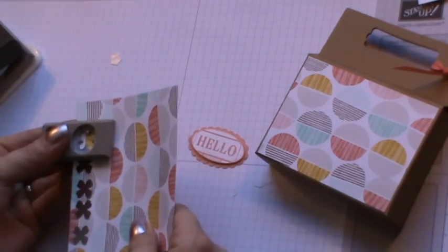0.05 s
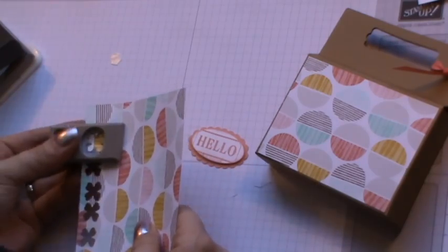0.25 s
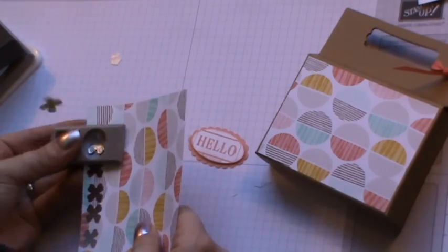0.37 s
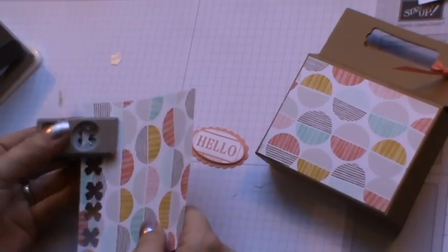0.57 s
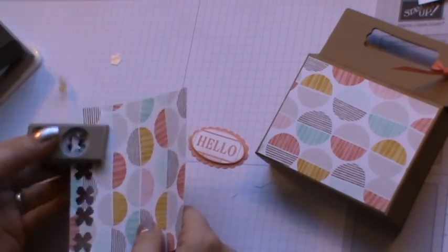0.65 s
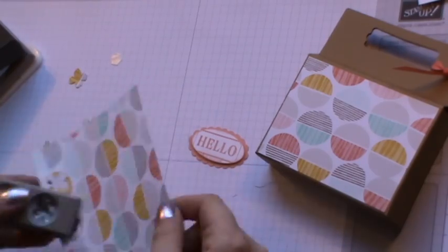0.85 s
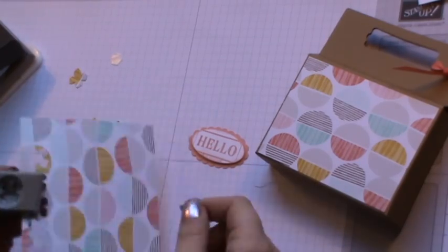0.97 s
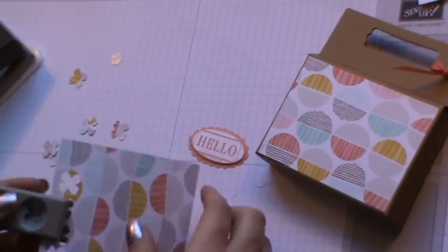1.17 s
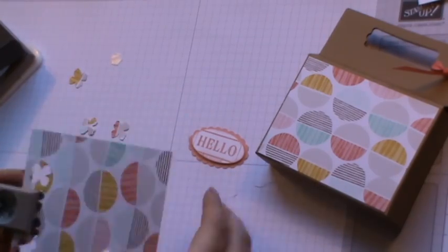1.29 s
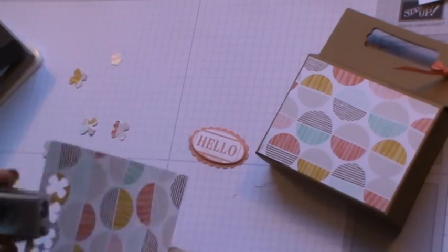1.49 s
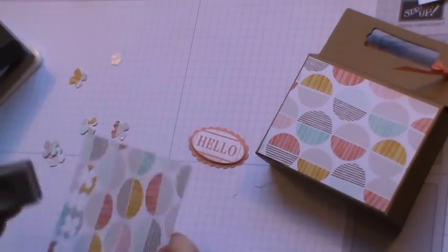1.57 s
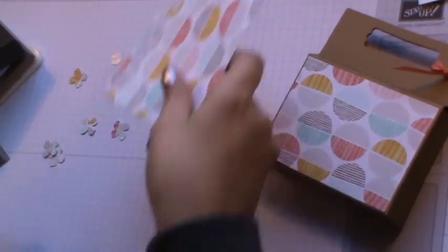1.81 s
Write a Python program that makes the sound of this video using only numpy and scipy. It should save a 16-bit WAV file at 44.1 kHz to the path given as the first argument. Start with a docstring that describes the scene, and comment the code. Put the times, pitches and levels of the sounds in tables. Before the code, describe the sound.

A hand paper punch clicks faintly at the start and more sharply at 0.2 s, then snaps hard through card at 0.35 s with a dull table thump and tearing crackle. Release clicks follow at 0.52 and 0.58 s, another at 0.79 s. Card scrapes and rustles until 1.4 s; light knocks come at 1.46 and 1.59 s. Close, dry room, soft hush, faint motor ticks and high whistle.

```python
"""At a crafting table in a dry room, a small hand punch bites through card, over soft room tone.
The lever clicks and rings, the die snaps through and springs back, and torn fibres crackle.
The card rubs, scrapes out of the slot and is waved aside; the punch is put down with two knocks.
Struck parts are fading sines; rubbing and scraping are shaped noise.
A small motor makes a few stronger steps, then also ticks steadily; a faint high whistle runs throughout."""
import sys
import numpy as np
from scipy import signal
from scipy.fft import rfft, irfft
from scipy.io import wavfile
from scipy.ndimage import uniform_filter1d

SR = 44100
rng = np.random.default_rng(int(sys.argv[2]) if len(sys.argv) > 2 else 0)


def transcribe(u):
    """Save the signal u as a 16-bit wav file named by the first command-line argument.

    u: samples, shape (n,) or (channels, n), limited to [-1, 1]; the rate is SR.
    q: integer samples, one column per channel.
    """
    v = np.clip(np.atleast_2d(u).T, -1, 1)
    q = np.round(v * 32767).astype(np.int16)
    wavfile.write(sys.argv[1], SR, q)


N = 81585
T = np.arange(N) / SR  # time of every sample [s]

# Room tone, before it is scaled to rms 1: (frequency [Hz], level [dB])
ROOM_TONE = [(25, -6.5), (60, -2.5), (130, 1.5), (300, 1), (1500, -6.5), (8000, -11.5), (13000, -13),
             (16000, -21)]
ROOM_TONE_DB = -56
# Side part of sound from all around, relative to the middle part: (frequency [Hz], level [dB])
SIDE_SPECTRUM = [(40, -18), (150, -2), (400, 4.5), (2500, 2.5), (8000, -2.5), (13000, -6.5)]

# Motor resonances, before each tick's chance strength:
# (frequency [Hz], level [dB], swing up and down on alternate ticks [dB])
MOTOR_MODES = [(1936, -60, 1), (2396, -63.5, 2)]
# Stronger motor steps on the upper resonance: (time [s])
STEP_TIMES = [.055, .123, .319, 0.959, 1.003, 1.72, 1.798]
STEP_DB = -54.5
TICK_PERIOD_S, TICK_WIDTH_S, TICKS_FROM_S = 0.0399, 0.0056, 0.37
WHISTLE_HZ, WHISTLE_DB = 15625, -61.5
WHISTLE_FLUTTER_HZ, WHISTLE_FLUTTER = 50, 0.29  # flutter depth is a share of the level

# Colour of the room's echo tail, before its spectrum is levelled out: (frequency [Hz], level [dB])
TAIL_SPECTRUM = [(100, 12.5), (700, 6.5), (2000, 6.5), (8000, 8), (15000, 1.5)]
# Tail settings before levelling; its energy is relative to the direct sound
TAIL_T60_S, TAIL_BUILD_S, TAIL_DB = 0.16, 0.003, -1.5
DIRECT_S, LEFT_DB = 0.0008, 0.5  # delay of the direct sound; left level over right

# Dull knocks passed to the table: (time [s], level [dB], lowest frequency [Hz], highest frequency [Hz])
KNOCKS = [(.001, -38, 620, 1530), (0.35, -16.5, 80, 221), (.578, -40.5, 764, 1370), (.792, -36, 1010, 1420),
          (1.464, -28.5, 302, 506), (1.469, -32, 587, 2730), (1.592, -30, 830, 1440),
          (1.603, -28.5, 550, 660)]
# Ringing of the table top: (frequency [Hz], level [dB], time to fade by 60 dB [s])
TABLE_MODES = [(149, -32.5, 0.074), (390, -8.5, 0.048), (483, -6, 0.045), (620, -4.5, 0.045),
               (875, -6, 0.045), (1108, -2, 0.029), (1460, 4, 0.012), (1893, 8, 0.012), (2555, 9.5, 0.013)]

# Card rubbing: (peak time [s], rise [s], fall [s], hiss level [dB], flutter level [dB],
# flutter frequency [Hz])
RUBS = [(0.169, 0.011, 0.0063, -49, -51.5, 1930), (0.348, 0.0018, 0.00095, -47, -21.5, 2300),
        (0.517, 0.04, 0.014, -50.5, -53.5, 2260), (.578, 0.02, 0.051, -53, -47, 1820),
        (0.851, 0.14, 0.099, -49.5, -57.5, 1720), (1.005, 0.023, 0.033, -63.5, -52, 740),
        (1.335, 0.035, 0.063, -57.5, -61.5, 525), (1.54, 0.028, 0.0037, -43, -50.5, 1880),
        (1.589, 0.0074, 0.0087, -40, -37, 1220), (1.788, 0.12, 0.044, -59, -74, 1030)]
# Colour of the card's hiss, before it is scaled to rms 1: (frequency [Hz], level [dB per Hz])
HISS_SPECTRUM = [(150, -52), (500, 1.5), (1500, 4.5), (3500, 0), (7500, 0.5), (10000, -1), (13000, 4),
                 (16000, -11)]
GRAINS_PER_S, GRAIN_SPREAD_DB = 4600, 4
FLUTTER_Q = 0.71  # low value: a broad resonance
# Card drawn out of the slot: (time [s], level [dB], resonance frequency [Hz])
SLIDE_PATH = [(0.669, -62, 1700), (0.756, -48, 1834), (.80, -47, 1255), (.845, -60, 851),
              (0.969, -63, 649.6)]
SLIDE_WIDTH_HZ = 840

# Spring singing: (peak time [s], rise [s], fall [s], level [dB], frequency at the peak time [Hz])
SPRING_SINGS = [(.01, 0.024, 0.01, -49.5, 3820), (0.545, 0.0091, 0.027, -51, 4030)]
SPRING_WIDTH_HZ, SPRING_SAG_HZ_PER_S = 690, 4300

# Card tearing under the die: (peak time [s], rise [s], fall [s])
CRUNCH_SWELL = (0.3567, 0.012, 0.037)
CRUNCH_PER_S, CRUNCH_HZ, CRUNCH_WIDTH_HZ = 2800, 2320, 1070
CRACKLE_DB, RATTLE_DB = -32, -32.5

# Ringing of the lever as it catches: (frequency [Hz], level [dB], time to fade by 60 dB [s])
LEVER_MODES = [(936, -35.5, 0.026), (1675, -24.5, 0.035), (2400, -23, 0.019)]
LEVER_S = 0.2

# Clicks of the punch: (time [s], crack level [dB], steel level before halving [dB], steel centre [Hz],
# shell level [dB], shell centre [Hz], loss per octave off centre [dB])
CLICKS = [(.002, -25, -31.5, 4230, -27.5, 1370, 5), (.1555, -43, -61, 12000, -55, 1600, 8),
          (0.1695, -34, -54, 12000, -52, 1900, 6), (0.1996, -16.5, -36, 11000, -34.5, 1750, 1.5),
          (.3473, -19.5, -53, 7000, -36, 2020, 20), (0.3500, -3.5, -9, 8900, -15.5, 2070, 16.5),
          (.359, -13, -38, 8900, -14, 2060, 53), (0.516, -20, -32.5, 6800, -34.5, 2170, 8),
          (0.5765, -25.5, -35, 4000, -28, 1390, 7), (0.7855, -19.5, -18, 5200, -38, 1270, 62),
          (1.4627, -27, -37.5, 6500, -30.5, 1030, 9), (1.5378, -43, -40, 11100, -35, 1620, 9),
          (1.5829, -25, -37, 7000, -44, 1400, 5), (1.591, -29.5, -41.5, 10000, -37.5, 1400, -3.5)]
# Ringing of the steel die and spring: (frequency [Hz], level [dB], time to fade by 60 dB [s])
STEEL_MODES = [(3020, -25, 0.021), (3915, 3.5, 0.017), (4780, 4.5, 0.0081), (5400, -2, 0.0059),
               (6395, 8.5, 0.0073), (7530, 5, 0.0055), (8090, -1, 0.0088), (11100, -5, 0.0036)]
# Ringing of the plastic shell: (frequency [Hz], level [dB], time to fade by 60 dB [s])
SHELL_MODES = [(570, -4, 0.016), (896, -6, 0.048), (1652, -5, 0.021), (1980, -1, 0.013), (2256, 3, 0.009),
               (2930, -4, 0.02)]
CRACK_T60_S = 0.0095  # fade time before levelling
CRACK_BOTTOM_HZ, CRACK_BRIGHT_HZ, CRACK_TOP_HZ, CRACK_BODY_DB = 1430, 4030, 14600, -11.5

EVEN_HZ = 300  # width of the average used to level out a spectrum
CUTOFF_HZ = 16200


def from_db(db):
    """Turn decibels into a gain."""
    return 10 ** (np.asarray(db) / 20)


def rms_one(x):
    """Scale a sound to an rms level of 1."""
    return x / np.sqrt(np.mean(x ** 2) + 1e-20)


def pan(db):
    """Give left and right gains that differ by this many decibels."""
    return from_db(np.array([[db], [-db]]) / 2)


def colour(x, points):
    """Make some pitches of a noise louder or softer, following a spectrum table."""
    hz, db = np.transpose(points)
    f = np.maximum(np.arange(N // 2 + 1) * SR / N, 1)
    gain = from_db(np.interp(np.log(f), np.log(hz), db))
    return irfft(rfft(x) * gain, N)


def cut(x, hz, kind, order=2):
    """Keep the part below ("low") or above ("high") a frequency."""
    return signal.sosfilt(signal.butter(order, hz, kind, fs=SR, output="sos"), x)


def resonate(x, hz, width_hz):
    """Pass a sound twice through one resonance for steep sides; rms 1."""
    b, a = signal.iirpeak(hz, hz / width_hz, SR)
    once = signal.lfilter(b, a, x)
    return rms_one(signal.lfilter(b, a, once))


def gliding(hz, width_hz):
    """Make a noise band whose centre follows a pitch curve; rms 1."""
    a, b = cut(rng.standard_normal((2, N)), width_hz / 2, "low")
    phase = 2 * np.pi * np.cumsum(hz) / SR
    return rms_one(a * np.cos(phase) + b * np.sin(phase))


def ring(modes):
    """A struck body sounds as a sum of fading sines, here a quarter second long."""
    t = T[:SR // 4]
    out = np.zeros(len(t))
    for k, (hz, db, t60) in enumerate(modes):
        sign = (-1) ** k  # neighbouring modes start in opposite directions
        fade = 1000.0 ** (-t / t60)
        out += sign * from_db(db) * fade * np.sin(2 * np.pi * hz * t)
    return out


def struck(modes, centre_hz, focus_db):
    """A contact favours modes near its centre pitch; a negative focus favours those far from it."""
    focused = [(hz, db - focus_db * abs(np.log2(hz / centre_hz)), t60) for hz, db, t60 in modes]
    return ring(focused)


def add(out, s, x):
    """Mix a sound in at a time in seconds."""
    i = int(s * SR)
    out[i:i + len(x)] += x[:N - i]


def swell(s, rise, fall):
    """A rounded rise to a peak, then a rounded fall."""
    return np.exp(-((T - s) / np.where(T < s, rise, fall)) ** 2)


def even(x):
    """Level out broad humps in a short noise's spectrum, keep its energy, return half a second."""
    spectrum = rfft(x, N)
    local = uniform_filter1d(np.abs(spectrum) ** 2, int(EVEN_HZ * N / SR), axis=-1)
    gain = np.sqrt(np.mean(local) / (np.abs(local) + 1e-12))
    return irfft(spectrum * gain, N)[..., :SR // 2]


def diffuse(spectrum):
    """Stereo noise from all sides: the side part has opposite signs left and right; rms 1."""
    mid, side = rng.standard_normal((2, N))
    stereo = mid + colour(side, SIDE_SPECTRUM) * np.array([[1], [-1]])
    return rms_one(colour(stereo, spectrum))


def grains(per_s=GRAINS_PER_S, spread_db=GRAIN_SPREAD_DB):
    """Paper fibres catch and slip as tiny pulses of random time, size and direction."""
    size_db = spread_db * np.minimum(rng.exponential(1, N), 4)
    sizes = from_db(size_db) * rng.choice([-1, 1], N)
    return sizes * (rng.random(N) < per_s / SR)


def room_tone():
    """The quiet room is a steady, soft noise from all sides."""
    return from_db(ROOM_TONE_DB) * diffuse(ROOM_TONE)


def whistle():
    """A faint high sine whose level flutters quickly."""
    flutter = 1 + WHISTLE_FLUTTER * np.sin(2 * np.pi * WHISTLE_FLUTTER_HZ * T)
    return from_db(WHISTLE_DB) * flutter * np.sin(2 * np.pi * WHISTLE_HZ * T)


def motor():
    """A small motor's regular ticks sound two resonances; stronger steps sound the upper one."""
    nearest = np.round(T / TICK_PERIOD_S).astype(int)  # number of the nearest tick
    tick = np.exp(-((T - nearest * TICK_PERIOD_S) / TICK_WIDTH_S) ** 2) * (T > TICKS_FROM_S)
    out = np.zeros(N)
    for hz, db, swing_db in MOTOR_MODES:
        # each tick has its own strength [dB] and phase [turns]
        strength_db, phase = rng.uniform(-0.93, 1, (2, N))[:, nearest]
        level = from_db(db + swing_db * (-1) ** nearest + strength_db)
        out += level * tick * np.sin(2 * np.pi * (hz * T + phase))
    steps = sum(np.exp(-((T - s) / TICK_WIDTH_S) ** 2) for s in STEP_TIMES)
    return out + from_db(STEP_DB) * steps * np.sin(2 * np.pi * MOTOR_MODES[-1][0] * T)


def room(x):
    """The room adds a short tail of fading noise from all sides to the direct sound."""
    envelope = from_db(-60 * T / TAIL_T60_S) * (1 - np.exp(-T / TAIL_BUILD_S))
    response = diffuse(TAIL_SPECTRUM) * envelope
    response *= from_db(TAIL_DB) / np.sqrt(np.sum(response ** 2) / 2)
    response[:, int(DIRECT_S * SR)] += 1  # the direct sound
    return pan(LEFT_DB) * signal.fftconvolve(x[None], even(response), axes=1)[:, :N]


def table():
    """Knocks ring the table top; place and softness of the contact decide which pitches answer."""
    out, top = np.zeros(N), ring(TABLE_MODES)
    for s, db, low_hz, high_hz in KNOCKS:
        knock = cut(cut(top, high_hz, "low", order=4), low_hz, "high", order=4)
        add(out, s, from_db(db) * knock)
    return out


def card():
    """Rubbed card hisses with fine grains; similar grains shake the sheet in a broad resonance."""
    hiss = rms_one(colour(grains(), HISS_SPECTRUM))
    shake = grains()
    out = np.zeros(N)
    for s, rise, fall, hiss_db, flutter_db, hz in RUBS:
        flutter = resonate(shake, hz, hz / FLUTTER_Q)
        out += swell(s, rise, fall) * (from_db(hiss_db) * hiss + from_db(flutter_db) * flutter)
    return out


def slide():
    """The scrape rises slightly, then sinks in pitch as more of the card comes free of the slot."""
    s, db, hz = np.transpose(SLIDE_PATH)
    level = from_db(np.interp(T, s, db, left=-np.inf, right=-np.inf))  # silent outside the path
    return level * gliding(np.interp(T, s, hz), SLIDE_WIDTH_HZ)


def spring():
    """The rubbed spring gives thin, rough notes that sag in pitch as it relaxes."""
    out = np.zeros(N)
    for s, rise, fall, db, hz in SPRING_SINGS:
        note = gliding(hz - SPRING_SAG_HZ_PER_S * (T - s), SPRING_WIDTH_HZ)
        out += from_db(db) * swell(s, rise, fall) * note
    return out


def crunch():
    """Behind the snap the last fibres tear: bright crackles that rattle the shell."""
    snaps = grains(per_s=CRUNCH_PER_S)
    crackle = rms_one(cut(snaps, CRUNCH_HZ, "high"))
    rattle = resonate(snaps, CRUNCH_HZ, CRUNCH_WIDTH_HZ)
    return swell(*CRUNCH_SWELL) * (from_db(CRACKLE_DB) * crackle + from_db(RATTLE_DB) * rattle)


def lever():
    """The lever takes up its play and rings at a few pitches."""
    out = np.zeros(N)
    add(out, LEVER_S, ring(LEVER_MODES))
    return out


def crack():
    """A hard contact gives a very short noise burst, mostly bright with a weaker body."""
    burst = even(rng.choice([-1, 1], N) * from_db(-60 * T / CRACK_T60_S) / 2)
    burst = cut(cut(burst, CRACK_TOP_HZ, "low"), CRACK_BOTTOM_HZ, "high", order=4)
    bright = cut(burst, CRACK_BRIGHT_HZ, "high", order=1)
    return bright + from_db(CRACK_BODY_DB) * burst


def punch():
    """Each click joins a crack, a ring of the steel and a hollow clack of the plastic shell."""
    out = np.zeros(N)
    for s, crack_db, steel_db, steel_hz, shell_db, shell_hz, focus_db in CLICKS:
        steel = struck(STEEL_MODES, steel_hz, focus_db) / 2
        shell = struck(SHELL_MODES, shell_hz, focus_db)
        add(out, s, from_db(crack_db) * crack())
        add(out, s, from_db(steel_db) * steel + from_db(shell_db) * shell)
    return out


def scene():
    """Punch, card and table sound in the room; room tone, whistle and motor are added directly."""
    background = room_tone() + whistle() + motor()
    handling = table() + card() + slide() + spring() + crunch() + lever() + punch()
    return background + room(handling)


def record(dry):
    """Remove the highest treble with a steep low-pass."""
    return signal.sosfilt(signal.ellip(10, 0.1, 80, CUTOFF_HZ, fs=SR, output="sos"), dry)


dry = scene()
out = record(dry)
transcribe(out)
```